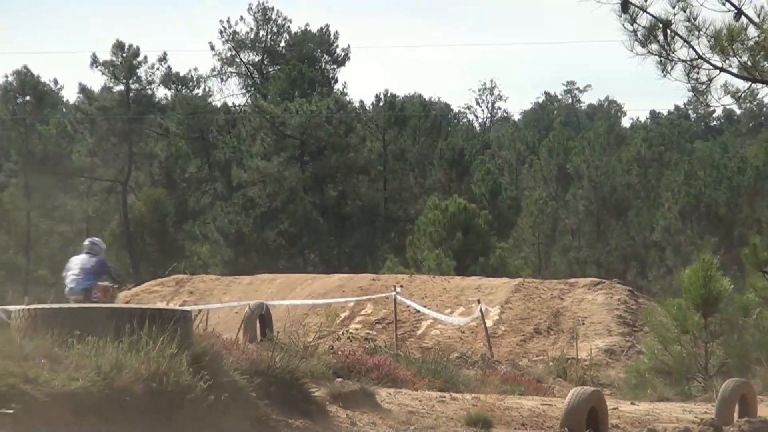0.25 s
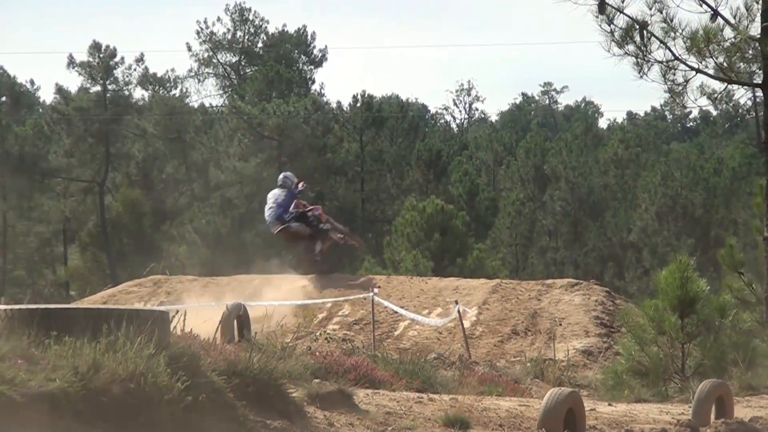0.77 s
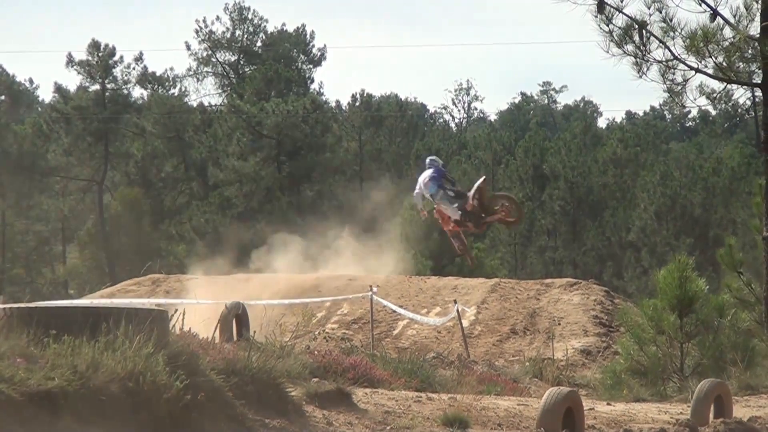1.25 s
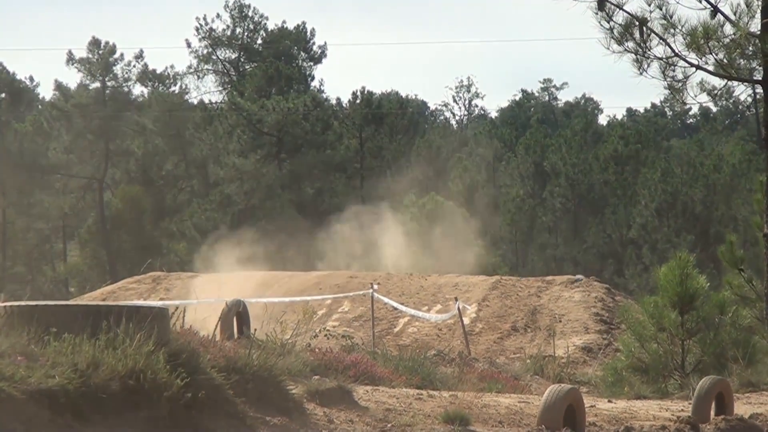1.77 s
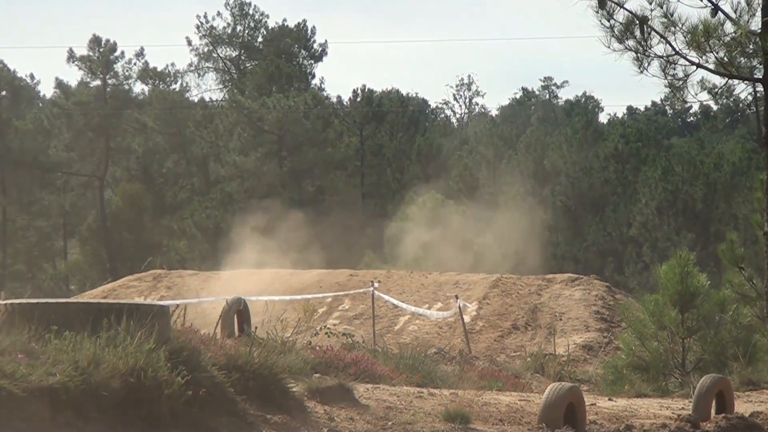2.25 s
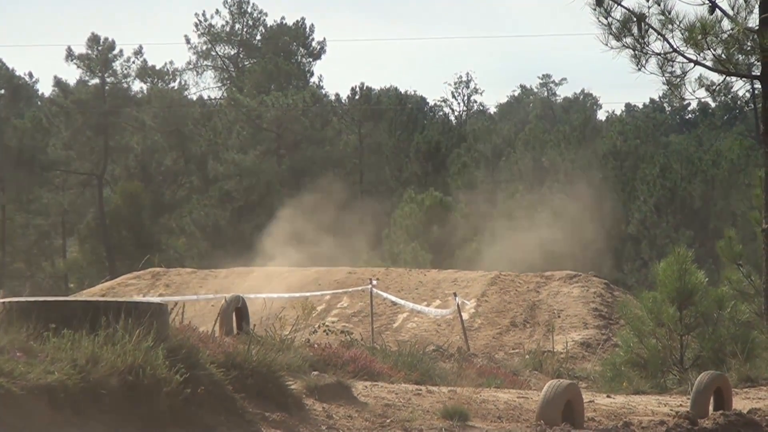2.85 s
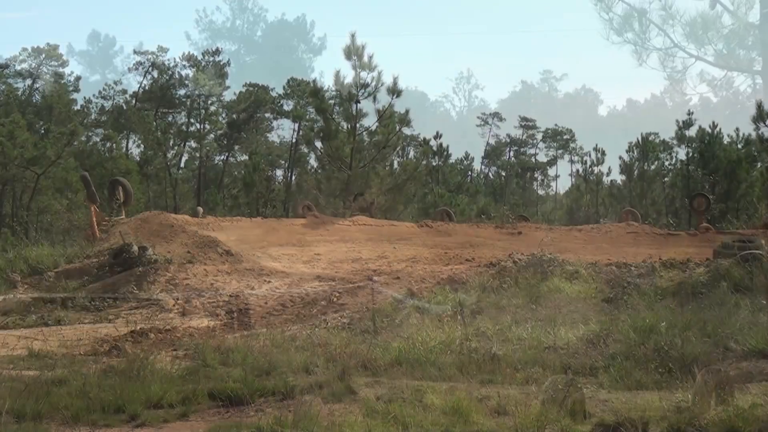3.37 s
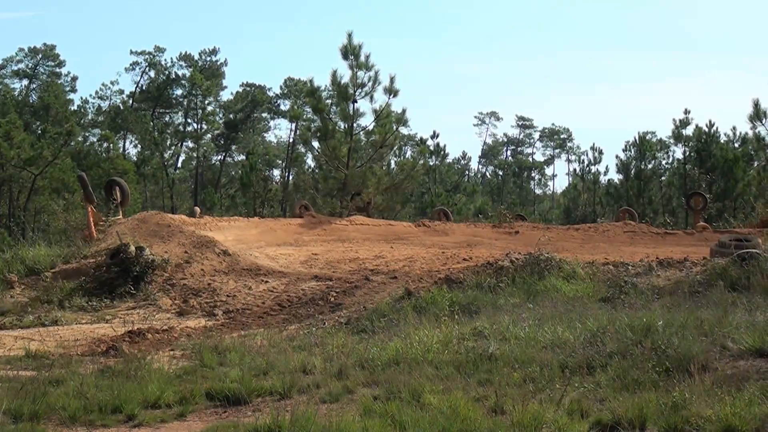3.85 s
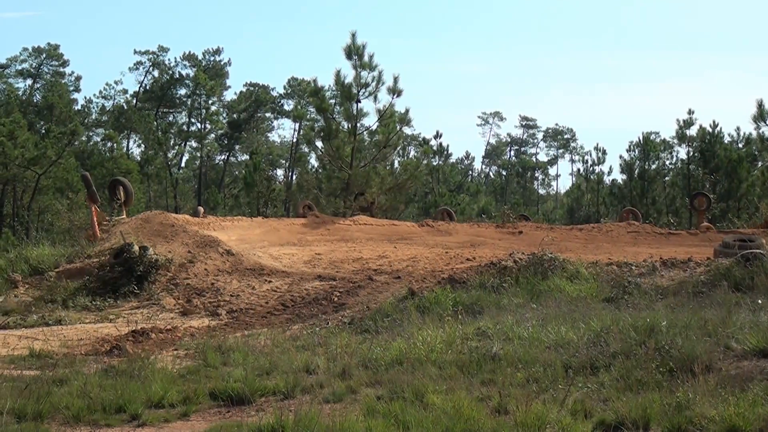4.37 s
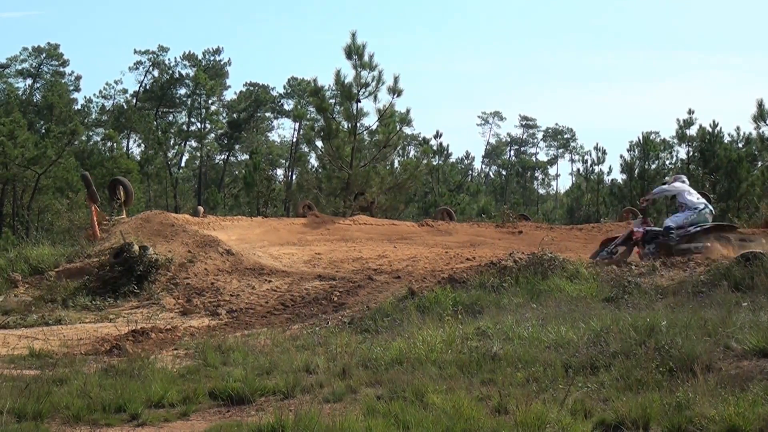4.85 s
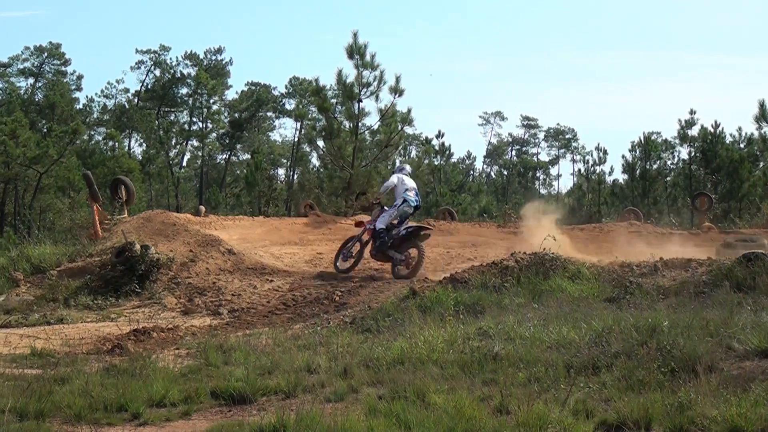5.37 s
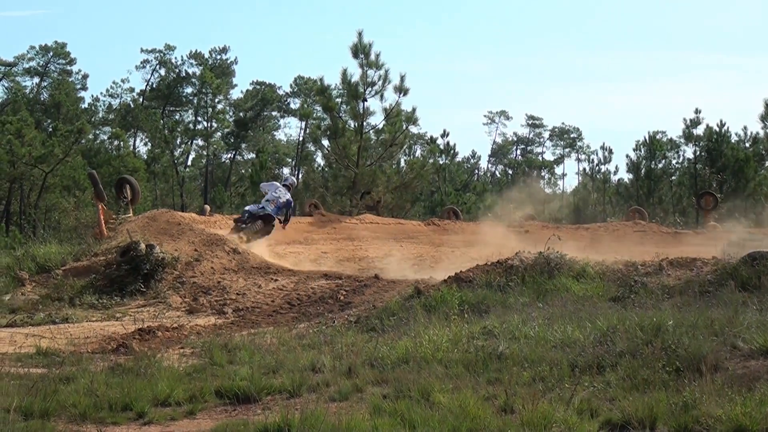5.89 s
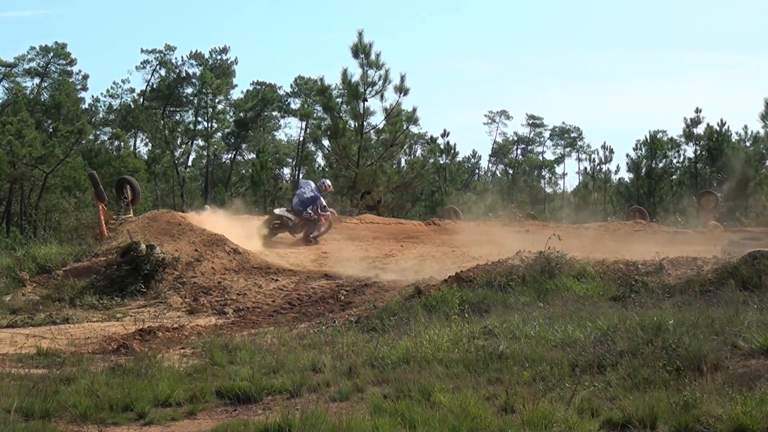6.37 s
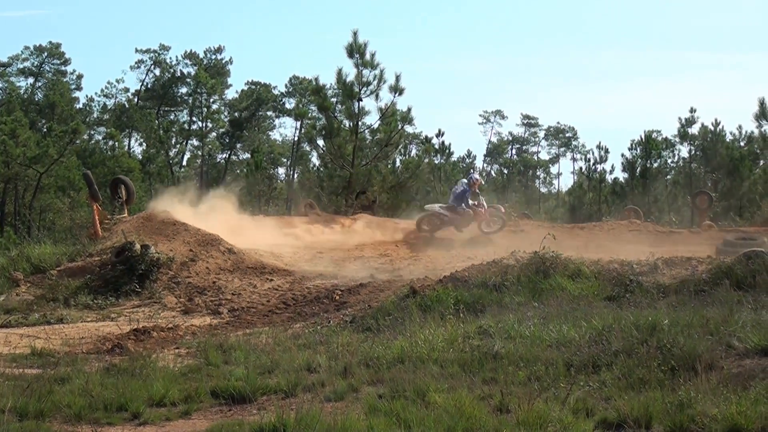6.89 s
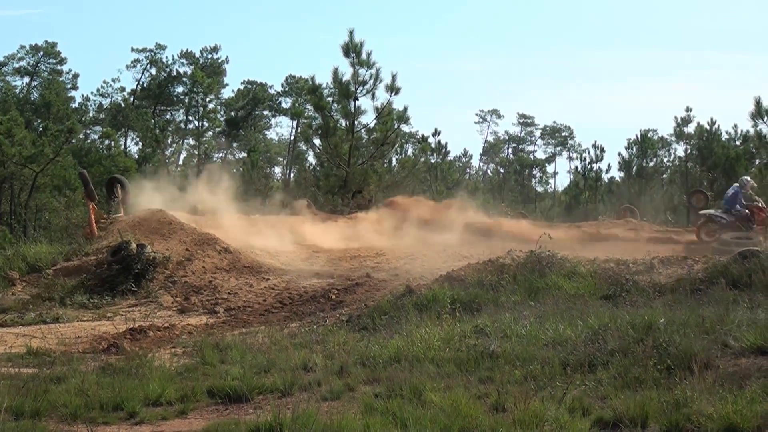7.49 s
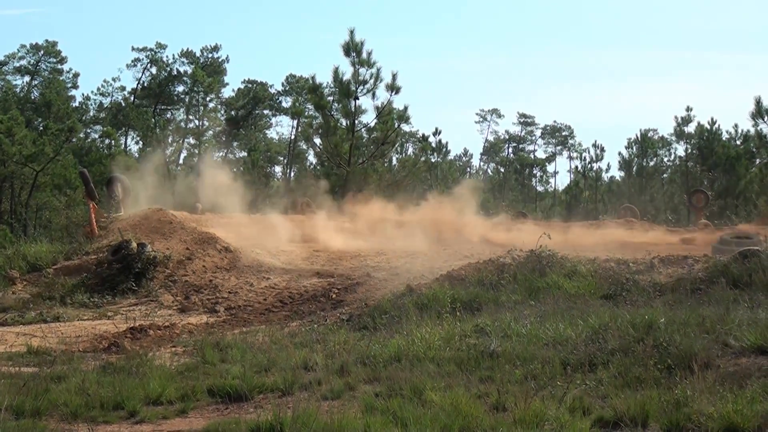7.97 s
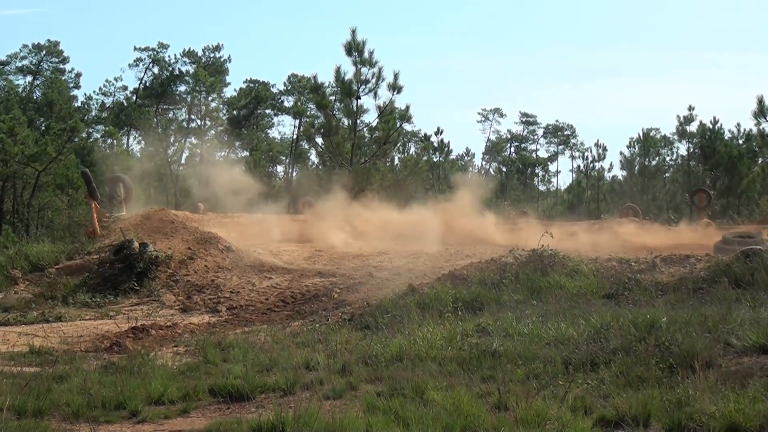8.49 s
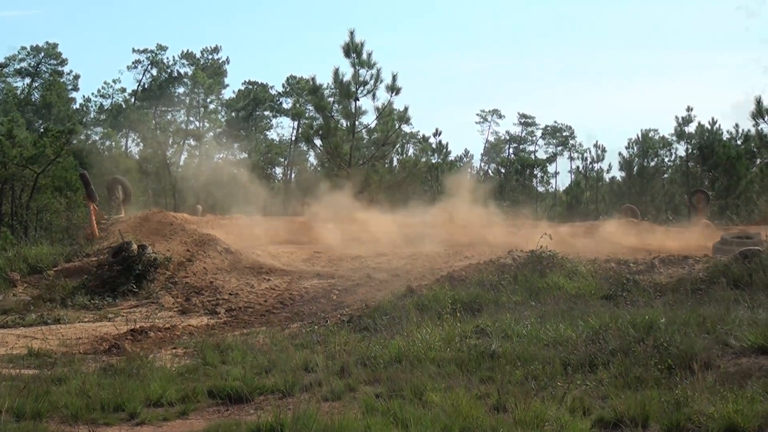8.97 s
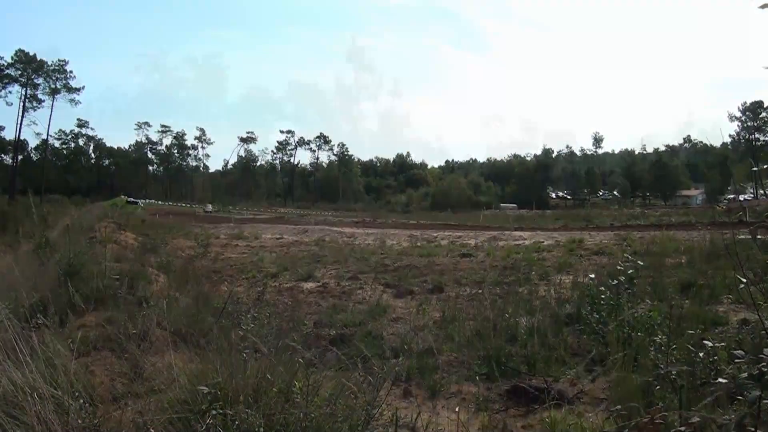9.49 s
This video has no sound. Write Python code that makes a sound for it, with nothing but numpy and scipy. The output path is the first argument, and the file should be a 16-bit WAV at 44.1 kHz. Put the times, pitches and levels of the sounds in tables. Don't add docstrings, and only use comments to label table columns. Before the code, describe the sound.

A dirt bike is heard from trackside, already loud at left, its engine note dropping then screaming mid-jump before receding right. After a soft cross-fade, it slows with uneven low chugging and crackling pops in a corner, blips, then accelerates with a thick barking exhaust and slipping rear wheel, fading right. Dry outdoor sound, light breeze, slight reflections from sand and trunks.

```python
import sys
import numpy as np
from scipy import signal
from scipy.fft import rfft, irfft, next_fast_len
from scipy.io import wavfile
from scipy.ndimage import uniform_filter1d

SR = 44100
rng = np.random.default_rng(int(sys.argv[2]) if len(sys.argv) > 2 else 0)


def voltage_ratio(level):
    return 10 ** (np.asarray(level, float) / 20)


def transcribe(signal):
    frames = np.atleast_2d(signal).T
    limited = np.clip(frames, -1, 1)
    pcm = np.round(limited * 32767).astype(np.int16)
    wavfile.write(sys.argv[1], SR, pcm)


N = 429093

# [hz, level_db]
CORNER_TOP = [(470, -28.5), (800, -18), (976, -5), (1130, -9), (1330, -7.5), (1800, -8.5), (2270, -5),
              (2710, -13), (2990, -7), (3880, -8.5), (4980, -6), (5640, -9.5), (8190, -9), (10100, -13.5),
              (15600, -37)]


def evened(x):
    return x / np.sqrt(np.mean(x ** 2) + 1e-20)


def smoothed(x, size):
    return uniform_filter1d(uniform_filter1d(x, size=size), size=size)


def steadied(x):
    return x / np.sqrt(abs(smoothed(x ** 2, 2600)) + 1e-12)


def read(points, hz):
    f, value = np.transpose(points)
    return np.interp(np.log(hz + 1), np.log(f + 1), value)


def curves(rows, t):
    s, *columns = np.transpose(rows)
    return [np.interp(t, s, c) for c in columns]


def colour(x, points):
    gain_db = read(points, abs(np.fft.fftfreq(16384, 1 / SR)))
    log_gain = np.log(voltage_ratio(np.maximum(gain_db, -90)))
    taps = np.fft.ifft(np.exp(log_gain - 1j * signal.hilbert(log_gain).imag)).real[:4096]
    return signal.oaconvolve(x, taps)[:len(x)]


def split(x, edge_hz, order=3):
    low = signal.sosfiltfilt(signal.butter(order, edge_hz, fs=SR, output="sos"), x)
    return low, x - low


def resonate(x, hz, width_hz, count=1):
    turn = np.exp(2j * np.pi * np.cumsum(hz) / SR)
    r = np.exp(-np.pi * width_hz / SR)
    return (turn * signal.sosfilt([[1 - r, 0, 0, 1, -r, 0]] * count, x * turn.conj())).real


def slips(t):
    # [peak_s, flare_hz, rise_s, fall_s]
    flares = [(.46, 5.5, 0.062, 0.04), (0.551, 7, 0.053, 0.05), (.67, 6.5, 0.045, 0.055),
              (.76, 6, 0.039, 0.084), (1.262, -29.5, 0.015, .016), (3.861, 13.5, .11, 0.084),
              (4.151, 9, 0.32, .11), (5.289, 5, 0.13, 0.076), (5.48, 3, 0.089, 0.12),
              (5.689, 8, 0.071, 0.098), (6.43, 2, .15, 0.084), (6.858, 4.5, 0.061, 0.046),
              (6.971, 6, 0.054, 0.088), (7.139, 11, 0.067, 0.06), (7.3, 25, .1, 0.061),
              (7.46, 21, 0.11, 0.064), (7.609, 16, .09, .09), (7.93, 22, .15, 0.25),
              (8.22, 11.5, 0.061, 0.099), (8.44, 22.5, .17, .13), (8.67, 34, .18, 0.087),
              (9.26, 13, .43, 0.065), (9.378, 11, .09, 0.063), (9.619, 19, 0.057, 0.045)]
    return sum(np.interp(t, (s - rise, s, s + fall), (0, hz, 0)) for s, hz, rise, fall in flares)


def crank(rate, lag_s, t):
    on_time = [.972, 2.125, 3.556, 3.673, 3.778, 3.848, 4.304, 4.394, 4.476, 4.596, 4.686, 5.213, 5.289,
               5.343, 6.108, 6.157, 6.288, 6.53, 6.68, 6.828, 6.966, 7.087, 7.7025, 7.82, 8.6655]
    turns = np.cumsum(rate) / SR
    marks = np.array([s for s in on_time if t[0] < s < t[-1]])
    marks = marks - np.interp(marks, t, lag_s)
    phase = (np.interp(marks, t, turns) + .5) % 1 - .5
    return turns - np.interp(t, marks, np.unwrap(phase, period=1))


def firings(rate, lag_s, ragged, t):
    at = np.flatnonzero(np.diff(np.floor(crank(rate, lag_s, t))))
    late, size_db, crack_db = rng.standard_normal((1200, 3))[:len(at)].T
    late_s = late * (.00005 + .0003 * ragged[at])
    alternate = (-1) ** np.arange(len(at))
    size_db = size_db * (.7 + 1.2 * ragged[at]) + .6 * ragged[at] * alternate
    at = np.clip(at + np.round(SR * late_s).astype(int), 0, len(t) - 1)
    pulses, cracks = np.zeros((2, len(t)))
    pulses[at] = voltage_ratio(size_db)
    crack_at = np.minimum(at + (lag_s[at] * SR).astype(int), len(t) - 1)
    cracks[crack_at] = voltage_ratio(np.interp(rate[at], (60, 80), (3, 1.5)) * crack_db)
    return pulses, cracks


def crack_share(rate, throttle, aim_db, climb):
    opened = np.clip((throttle - .45) * 5, np.clip((rate - 62) / 100, .02, .35), 1)
    facing = np.clip(.72 + .045 * aim_db + climb / 900, .02, 1)
    return opened * facing * np.clip(rate / 66, 0, 1) ** 3


def ground(x, delay_ms, strength):
    u = np.arange(len(x)) / SR
    return x - strength * np.interp(u - delay_ms / 1000, u, x)


def jets(cracks, turbulence, rings, heat, top):
    gate = signal.lfilter([1], [1, -np.exp(-1 / (0.003 * SR))], cracks)
    hiss = split(turbulence, 3000, order=2)[1]
    front = -cracks + gate * (.045 * turbulence + .1 * hiss)
    low, high = split(colour(front, top), 3630)
    low = ground(low, 2.258 / heat, -0.23)
    flutter = heat * (1 + .012 * evened(uniform_filter1d(turbulence, size=700)))
    ring, knots = 0, np.arange(0, len(front) + 4000, 4000)
    for hz, width_hz, db in rings:
        swap = evened(np.interp(np.arange(len(front)), knots, rng.standard_normal(len(knots))))
        mode = evened(resonate(front, hz * flutter, width_hz, count=2))
        ring = ring + voltage_ratio(db + 5 * swap) * mode
    return steadied(steadied(low) + 0.8 * steadied(ring)), steadied(high)


def pipe_rings(cracks, t):
    # [time_s, ring_hz, level_db, length_s]
    moments = [(1.06, 1563, -30, 0.042), (1.222, 2130, -10, 0.054), (1.244, 3320, -20, 0.065),
               (1.423, 1460, -14, 0.044), (1.597, 1510, -1, .07), (2.195, 1540, -6.5, 0.054),
               (6.127, 2030, -15, 0.045), (6.308, 1900, -14.5, 0.029), (6.563, 2130, -15, 0.044),
               (6.66, 1980, -20, 0.024), (6.842, 990, -9.5, 0.18), (6.96, 2030, -10, 0.048),
               (7.14, 1490, -15, 0.073), (7.39, 1840, -6, .04), (7.53, 1895, -9, .04),
               (7.75, 1800, -6.5, 0.035), (7.877, 1373, -21, 0.037), (8.049, 1530, -22, 0.031),
               (8.17, 1840, -9.5, 0.051), (8.346, 1870, -25.5, 0.035), (8.421, 1380, -18, 0.037),
               (8.67, 1700, -10, 0.067), (8.721, 1374, -14, 0.046), (8.991, 1700, -12, 0.087),
               (.8, 510, -16.5, 0.1), (1.22, 910, -11, 0.036), (1.943, 600, -15, 0.16),
               (2.198, 1052, -13, .06), (2.7, 600, -23, 0.046), (2.997, 140, -10, 0.12),
               (6.712, 328, -10, 0.075), (7.19, 300, 0.5, 0.049), (7.354, 323, -5, .04),
               (7.45, 487, -16, 0.041), (7.6, 480, -16, 0.039), (7.914, 610, -16, 0.073),
               (8.105, 600, -24, 0.031), (8.416, 624, -15, 0.039), (8.66, 660, -18, 0.041),
               (8.85, 2092, -15.5, 0.089), (5.445, 340, -13.5, .15), (6.16, 370, -10.5, 0.096),
               (6.42, 363, -10, 0.11), (6.93, 348, -8, .11), (7.075, 1500, -14, .04),
               (8.57, 3000, -20, 0.083)]
    out = np.zeros(len(t))
    for s, hz, db, length in moments:
        near = abs(t - s) < 3 * length
        if near.any():
            ring = resonate(-cracks[near], np.full(near.sum(), hz), 0.24 * hz, count=2)
            out[near] += voltage_ratio(db) * np.exp(-((t[near] - s) / length) ** 2) * evened(ring)
    return out


def engine(t, grip, ride, laws, bank, rings, pipe, slosh, top, lean, sand_ms, front_lag_s):
    n = len(t)
    flare = slips(t)
    cut = np.exp(-((t - 8.5) / .035) ** 2)
    grip_rate = curves(grip, t)[0]
    rate = grip_rate + flare
    level_db, throttle, aim_db, distance = curves(ride, t)
    level_db = level_db + 0.0943 * flare - 5 * cut
    aim_db = aim_db - 2 * cut
    throttle = np.clip(throttle, 0, 1)
    climb = uniform_filter1d(np.gradient(rate - flare) * SR, size=2000)
    share = crack_share(rate, throttle, aim_db, climb)
    octaves, doublings = np.log2(rate / 60), np.log2(abs(distance) / 25)
    bark_db, sizzle_db, bass_db = np.array(laws) @ [np.ones(n), throttle, aim_db, octaves, doublings]

    keep = np.exp(-1 / (0.34 * SR))
    moved = throttle - throttle[0]
    snap = np.clip(moved - signal.lfilter([1 - keep], [1, -keep], moved), 0, 1)
    bark_db, aim_db = bark_db - 0.5 * snap, aim_db - 0.5 * snap
    share = np.clip(share + .4 * snap, 0, 1)

    ragged = lean * (1 - throttle)
    lag_s = np.interp(rate, (62, 76), (.0022, front_lag_s))
    waver_hz, waver_s = 1.6, .08
    beats = np.arange(t[0], t[-1] + waver_s, waver_s)
    rate = rate + waver_hz * ragged * np.interp(t, beats, rng.standard_normal(len(beats)))
    pulses, cracks = firings(rate, lag_s, ragged, t)

    noise = rng.standard_normal((3, n))
    puff = signal.lfilter([1], [1, -np.exp(-1 / (0.015 * SR))], pulses) * noise[0]
    opened = steadied(colour(-evened(pulses) + .05 * evened(puff), pipe))
    shut = steadied(slosh(evened(pulses) + .12 * evened(puff), rate))
    direct = throttle * opened + (1 - throttle) * shut
    exhaust = direct
    for start, end, delay_ms, strength, tilt_db in bank:
        along = np.clip(np.minimum(t - start, end - t) / 0.12 + .5, 0, 1)
        exhaust = exhaust + along * strength * np.interp(t - delay_ms / 1000, t, direct)
        bark_db, bass_db = bark_db + along * tilt_db, bass_db - along * tilt_db

    boom, bark = split(exhaust, 378, order=8)
    bass, body = split(boom, 123)
    lug = throttle * np.clip((68.3 - rate) / 12, 0, 1)
    header_hz = 212 + 4.1 * (np.clip(rate, 40, 70) - 45)
    body = body + 0.6 * lug * 4 * resonate(body, header_hz, 82)
    boom = body + voltage_ratio(bass_db) * bass

    bark = np.interp(t - lag_s + .0007, t, bark)
    bark = bark + (0.21 + 0.56 * lug) * np.interp(t - .0076, t, bark)
    can = evened(resonate(bark, np.full(n, 625), 23))
    bark = evened(bark) + 0.43 * lug * can
    rough = evened(split(colour(noise[1], pipe), 460)[1])
    bark = steadied(bark) + (.04 + .7 * ragged) * rough

    wander = evened(smoothed(noise[2], 6000))
    heat = 1 - 0.0027 * flare + 0.039 * wander
    crack = jets(cracks, noise[2], rings, heat, top)
    flicker = voltage_ratio((0.42 + 1.34 * ragged) * evened(uniform_filter1d(noise[1], size=500)))
    clatter = [evened(part) for part in split(colour(noise[0] * flicker, top), 2810)]
    rasp = np.sqrt(share) * 3.6 * crack[0] + clatter[0]
    crisp = np.clip(rate / 85, 0, 1) ** 1.5
    sizzle = share * crisp * 3.2 * crack[1] + clatter[1]
    rasp = ground(rasp, sand_ms * (1 + .04 * wander), .45)
    sizzle = ground(sizzle, sand_ms * (1 + .06 * wander), .2)

    gust_db = [1.3 * evened(smoothed(row, 3000)) for row in noise[:2]]
    levels_db = (0, bark_db, aim_db + gust_db[0], sizzle_db + gust_db[1])
    layers = zip(levels_db, (boom, bark, rasp, sizzle))
    sound = sum(voltage_ratio(db) * steadied(part) for db, part in layers) + pipe_rings(cracks, t)
    s = np.transpose(ride)[0]
    fade = np.clip(np.minimum(t - s[0] + (s[0] < 1), s[-1] - t + (s[-1] > 9)) * 4, 0, 1)
    return np.sqrt(fade) * voltage_ratio(level_db) * sound


def jump_pass():
    # [time_s, rate_hz]
    grip = [(0.0, 85), (0.19, 87.65), (0.4, 60.14), (0.86, 65.43), (0.95, 70.4), (1.09, 93.14),
            (1.2, 116.7), (1.27, 118.6), (1.75, 80.2), (2.08, 63.14), (2.44, 124.2), (2.51, 113.5),
            (2.54, 94.2), (2.63, 80.9), (2.79, 88.8), (2.86, 78.9), (3.02, 66.3), (3.42, 63.7)]
    # [time_s, loudness_db, throttle_0_to_1, tailpipe_aim_db (less when turned away), distance_m]
    ride = [(0, -17.5, 0.66, -8.5, 33), (0.219, -13.5, 0.9, -14.5, 38), (.28, -25.5, 0, -11.5, 44),
            (.45, -28, 0.41, -16.5, 50), (.89, -25.5, 0.49, -16, 36.5), (1.0, -16.5, 0.75, -8.5, 23.4),
            (1.21, -17, 0.71, -6, 22), (1.27, -17, 0.56, -10, 19.8), (1.63, -34, 0.31, 4.5, 15.9),
            (1.97, -34.5, 0.53, -9.5, 22), (2.09, -38, 0.5, -14.5, 39), (2.144, -26, 0.84, -3.5, 25),
            (2.29, -15.5, 0.77, -17, 42), (2.38, -19.5, 0.47, -20, 49), (2.51, -25, 0.96, -17, 43),
            (2.721, -22, 0.5, -22, 39), (2.8, -38, 0.23, -5.5, 36), (3.42, -35.5, 0.2, -40, 110)]
    # [base_db, full_throttle_db, db_per_aim_db, db_per_octave, db_per_doubling_of_m]
    laws = [(-5, 14, 1.8, 4.5, 11.5), (-8.5, -7, 0.42, 6, -12), (19, -1.5, 0.47, -1, 13.5)]
    # [from_s, to_s, delay_ms, strength_0_to_1, tilt_bass_to_bark_db]
    bank = [
        (0.71, 4.8, 1.1, 0.58, -4),
    ]
    # [ring_hz, width_hz, level_db]
    rings = [(1056, 260, 2.5), (1650, 180, -0.5), (2000, 510, 4)]
    # [hz, level_db]
    pipe = [(29, -26), (50, -30.5), (100, -13.5), (267, 6), (432, -10), (507, -7.5), (950, -31),
            (1240, -33), (2090, -120)]
    # [hz, level_db]
    shut_pipe = [(29, -101), (50, -52.5), (91, -14), (128, 0), (163, -6.5), (217, 5.5), (317, -2.5),
                 (372, -15), (633, -3), (950, -34), (1240, -28), (2090, -120)]
    # [hz, level_db]
    top = [(470, -43.5), (800, 6), (884, -16), (1050, 2.5), (1240, 7), (1490, 3.5), (1890, 5.5), (2190, 2),
           (2480, 2.5), (2990, 1), (3350, 3.5), (6470, -7), (8300, -6), (15600, -30)]

    def slosh(x, rate):
        return colour(-x, shut_pipe)

    t = np.arange(-SR // 4, SR * 7 // 2) / SR
    bike = engine(t, grip, ride, laws, bank, rings, pipe, slosh, top,
                  lean=.25, sand_ms=1.61, front_lag_s=.0028)[SR // 4:]
    return np.pad(bike, (0, N - len(bike)))


def woods(x):
    # [hz, t60_s]
    decay = [(100, 0.85), (500, 0.41), (2000, 0.29), (8000, 0.064)]
    taps = np.zeros((2, SR // 2))
    at = np.arange(500, SR // 2 - 20, 20) + rng.integers(0, 20, (2, (SR // 2 - 501) // 20))
    np.put_along_axis(taps, at, rng.choice([-1., 1.], at.shape), 1)
    hz, lag, z = signal.stft(taps, SR, nperseg=256)
    tail = signal.istft(z * voltage_ratio(-60 * lag / read(decay, hz)[:, None]), SR, nperseg=256)[1]
    return signal.fftconvolve(x[None], tail / np.linalg.norm(tail[0]), axes=1)[:, :N]


def air():
    # [hz, level_db]
    wind = [(20, -20), (35, -26), (60, -21), (200, -11), (1000, -25.5), (5000, -41.5), (15000, -56)]
    shared, left, right, gust = rng.standard_normal((4, N))
    lumps = voltage_ratio(2.0 * evened(uniform_filter1d(gust, size=9000)))
    both = np.array([colour(shared + 0.31 * own, wind) for own in (left, right)])
    return voltage_ratio(-39.5) * lumps * evened(both)


def ports(x):
    # [hz, left_lead_rad, share_of_pan]
    pair = [(40, -0.45, 0.12), (260, -0.34, 0.59), (600, -0.28, 0.37), (1260, 0.097, 0.3),
            (2410, -0.5, 0.55), (3500, -0.0083, 0.5), (15000, -0.19, 1)]
    # [time_s, left_minus_right_db]
    path = [
        (0.0, 3),
        (3.0, -1.5),
        (3.36, -6),
        (5.77, 0.5),
        (6.83, 1),
        (9.73, -5.5),
    ]
    size = next_fast_len(N)
    hz = np.fft.rfftfreq(size, 1 / SR)
    f, lead, share = np.transpose(pair)
    spectrum = rfft(x, size)
    side = np.tanh(curves(path, np.arange(N) / SR)[0] * np.log(10) / 40)
    panned = irfft(spectrum * read(np.c_[f, share], hz), size)[:N] * side
    shifted = irfft(spectrum * 1j * np.tan(read(np.c_[f, lead], hz) / 2), size)[:N]
    return x + np.array([[1], [-1]]) * (panned + shifted)


def pops():
    # [time_s, peak_db, length_s]
    bangs = [(2.72, -22, 0.016), (3.382, -32, 0.013), (3.586, -32, 0.045), (3.659, -25.5, 0.013),
             (4.321, -12, 0.016), (4.346, -16, .01), (4.404, -14, 0.0099), (4.462, -11.5, 0.027),
             (4.495, -17, 0.014), (4.686, -14, 0.011), (4.596, -11.5, 0.015), (4.667, -16.5, 0.015),
             (4.837, -11, 0.018), (4.852, -11, 0.01), (4.889, -30.5, 0.014), (4.917, -6.5, 0.0092),
             (5.348, -8.5, 0.012), (5.751, -11.5, 0.017), (5.952, -10, 0.021), (5.987, -8, 0.013)]
    burst = np.zeros(N)
    for s, peak_db, length in bangs:
        near = slice(round(s * SR), round(s * SR) + SR // 10)
        u = (np.arange(N)[near] / SR - s) / length
        burst[near] += voltage_ratio(peak_db - 14) * np.clip(u * 13.0, 0, 1) * np.exp(-np.clip(u, 0, 9) ** 2 * 2.6)
    return burst * evened(colour(rng.standard_normal(N), CORNER_TOP))


def burble(ring_hz, glide, length_s, swell):
    u = np.arange(0, length_s, 1 / SR)
    cycles = ring_hz * u * (1 - glide * u / length_s)
    return np.sin(2 * np.pi * cycles) * signal.windows.tukey(len(u), .5) * np.exp(swell * u / length_s)


def overrun(x, rate):
    quick = np.clip((rate - 31) / 17 + 0.26 * rng.standard_normal(len(x)), 0, 1)
    high = burble(227.0, 0.29, 0.0192, 0.98)
    low = burble(179.3, 0.24, 0.0218, 0.24)
    slosh = signal.oaconvolve(x * quick, high)[:len(x)] + signal.oaconvolve(x * (1 - quick), low)[:len(x)]
    return ground(slosh, 13.44, -0.16)


def corner_pass():
    # [time_s, rate_hz]
    grip = [(3.2, 47.94), (3.55, 43.7), (3.75, 37), (4.26, 32.29), (4.46, 42.62), (4.64, 45.7),
            (4.97, 33.7), (5.1, 50.45), (5.62, 49.97), (6.08, 30.77), (6.18, 46.22), (6.5, 49.06),
            (6.8, 62.77), (7.2, 61.86), (7.52, 84.54), (8.8, 84), (9.5, 86.75), (9.73, 78.7)]
    # [time_s, loudness_db, throttle_0_to_1, tailpipe_aim_db, distance_m]
    ride = [(3.199, -29, 0.13, -21.5, 40), (4.2, -28.5, 0.065, -17, 24), (4.341, -23, 0.036, -7.5, 28),
            (5.152, -18.5, 0.035, -16, 22.5), (5.22, -21, 0.76, -7.5, 26.3), (5.68, -20, 0.58, -8, 22.4),
            (5.73, -17, 0.04, -15, 24.6), (5.9, -20, 0.031, -14, 24), (6.09, -19.5, 0.1, -25, 17),
            (6.109, -18, 0.7, -17, 22), (6.33, -15, 0.75, -15, 26.5), (6.66, -20.5, 0.72, -2.5, 30.5),
            (6.8, -18.5, 0.98, -4.5, 25), (7.25, -17.5, 0.93, -4, 24.7), (8.1, -18, 0.93, -5.5, 27.2),
            (9.2, -16, 0.79, -11, 37.8), (9.401, -25, 0.85, -12.5, 33), (9.73, -36.5, 0.42, -7.5, 77)]
    # [base_db, full_throttle_db, db_per_aim_db, db_per_octave, db_per_doubling_of_m]
    laws = [(-13, 11, 0.47, -6, 6.5), (-5.5, -3.5, 0.83, 1.5, -13.5), (-3, 8.5, 0.38, -8.5, 8)]
    # [from_s, to_s, delay_ms, strength_0_to_1, tilt_bass_to_bark_db]
    bank = [
        (5.22, 5.71, 2.8, 0.2, -1),
        (6.162, 6.696, 7.03, 0.27, 2.5),
        (6.717, 7.143, 2.45, 0.76, -4),
    ]
    # [ring_hz, width_hz, level_db]
    rings = [(1030, 184, -6.5), (1343, 490, 8), (1930, 600, -0.5)]
    # [hz, level_db]
    pipe = [(24, -99), (40, -29), (86, 6), (139, 10), (179, 14.5), (224, 4.5), (284, 11.5), (340, -5),
            (410, -19.5), (560, -13), (810, -20), (950, -22), (1240, -24.5), (2090, -120)]
    t = np.arange(SR * 3, N) / SR
    bike = engine(t, grip, ride, laws, bank, rings, pipe, overrun, CORNER_TOP,
                  lean=1.43, sand_ms=0.909, front_lag_s=.006)
    return np.pad(bike, (N - len(bike), 0))


def knocks():
    # [time_s, peak_db, length_s, top_hz]
    hits = [(3.56, -32.5, 0.058, 760), (3.666, -32, 0.015, 2400), (3.97, -48, .014, 2300),
            (5.202, -19, 0.0054, 2190), (5.217, -27.5, 0.0047, 2796), (5.26, -27, 0.0044, 2600),
            (5.268, -14, 0.012, 1850), (5.294, -20, 0.013, 2200), (5.8, -22, 0.009, 2850),
            (5.825, -19, 0.0052, 2800), (8.538, -23, 0.0044, 2600)]
    out = np.zeros(N)
    for s, peak_db, length, top_hz in hits:
        u = np.arange(SR // 10) / SR / length
        sos = signal.butter(3, (300, top_hz), "bandpass", fs=SR, output="sos")
        band = evened(signal.sosfilt(sos, rng.standard_normal(len(u))))
        shape = np.clip(u * 12, 0, 1) * np.exp(-2.5 * np.minimum(u, 9) ** 2)
        out[round(s * SR):][:len(u)] += voltage_ratio(peak_db) * shape * band
    return out


def scene():
    bike = jump_pass() + corner_pass() + pops() + knocks()
    echo = woods(split(bike, 206)[1])
    return ports(bike) + voltage_ratio(-21.0) * echo + air()


def band_limit(x):
    return signal.sosfilt(signal.butter(12, 15800, fs=SR, output="sos"), x)


def record(dry):
    held = .98 * np.tanh(dry / .98)
    return band_limit(held - held.mean())


dry = scene()
out = record(dry)
transcribe(out)
```